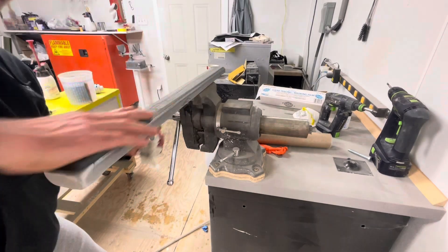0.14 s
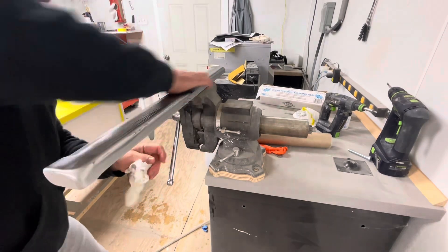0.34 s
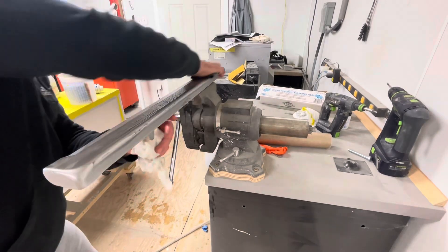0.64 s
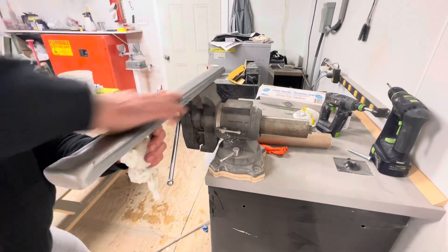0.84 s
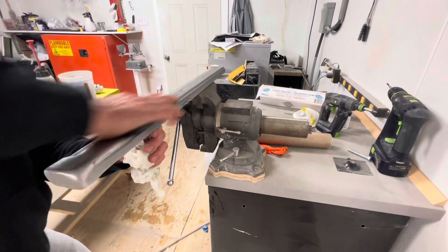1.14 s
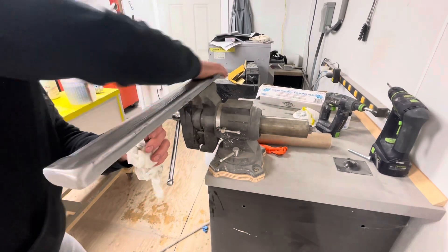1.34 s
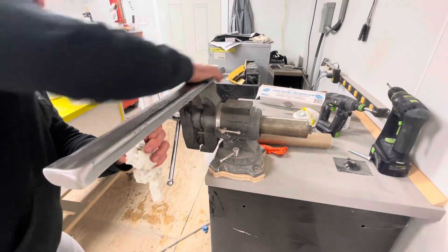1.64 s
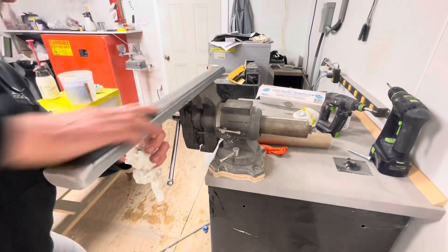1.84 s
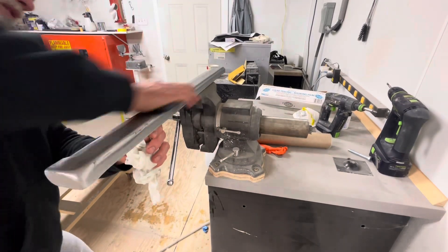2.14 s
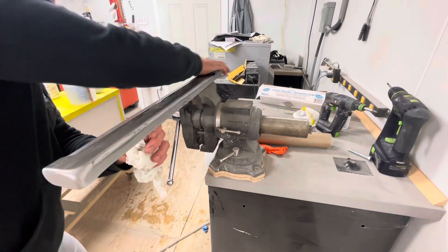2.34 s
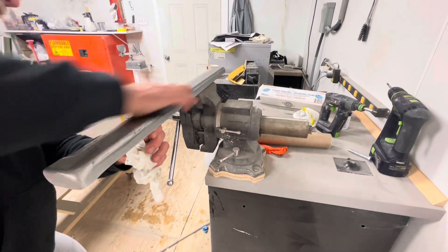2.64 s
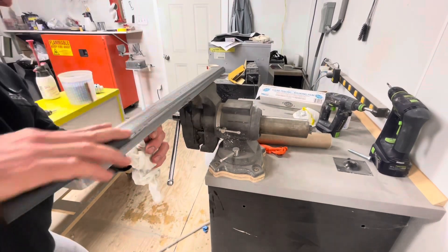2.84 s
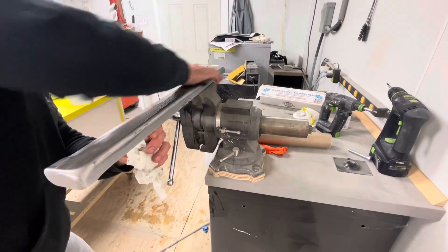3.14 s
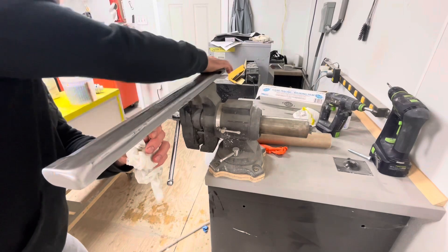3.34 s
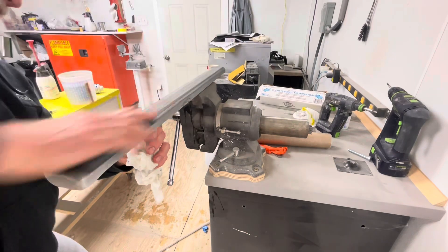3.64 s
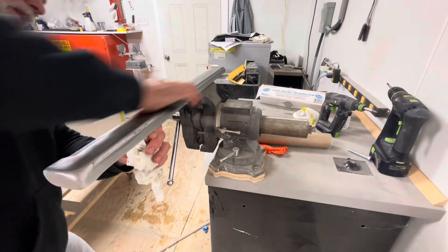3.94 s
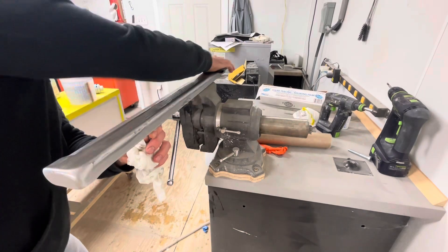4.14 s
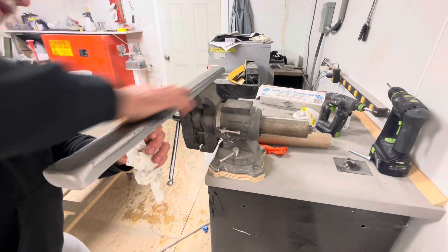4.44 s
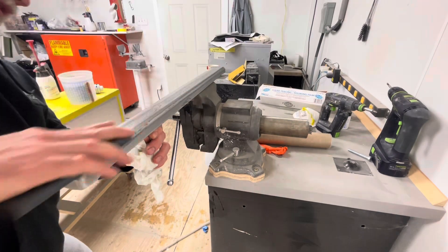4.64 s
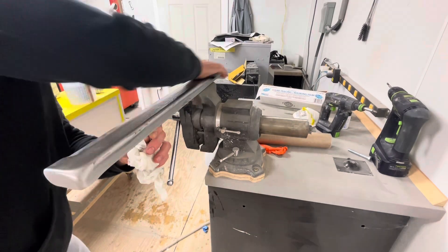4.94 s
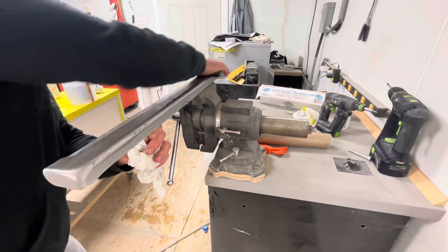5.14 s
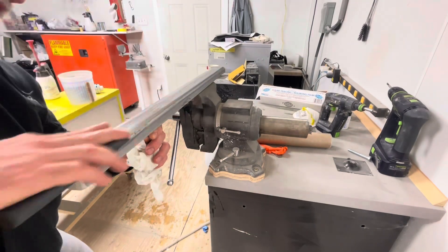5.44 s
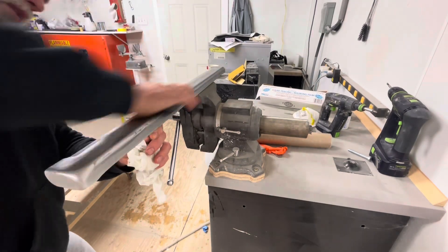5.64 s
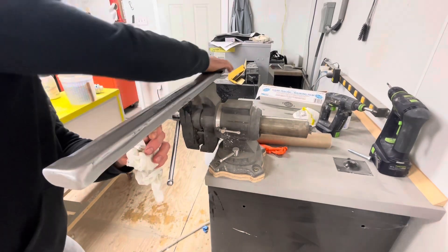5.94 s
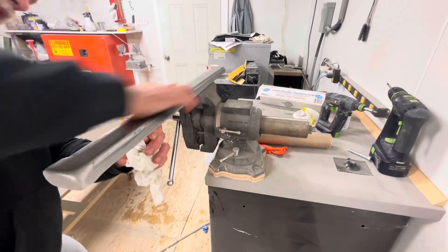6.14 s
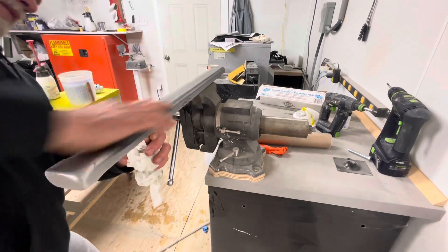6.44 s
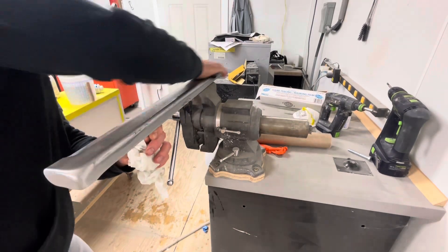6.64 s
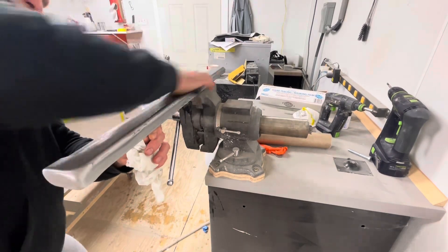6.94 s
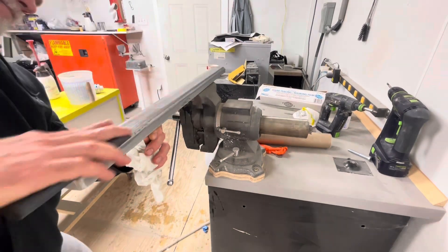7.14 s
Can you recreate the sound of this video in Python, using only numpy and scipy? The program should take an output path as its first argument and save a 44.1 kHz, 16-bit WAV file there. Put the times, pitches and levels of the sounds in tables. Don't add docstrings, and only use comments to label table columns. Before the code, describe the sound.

Sanding is already under way at 0 s: gritty paper scrapes along a clamped steel bar in strokes of roughly 0.45 s, alternately pulling near and pushing away. Each stroke is a dense, dry hiss with bright scratch, fizzy treble and a nasal metallic rasp, surging mid-stroke and dropping almost out at the turn. A soft sleeve rustle fades at the start. A low thud comes at about 0.6 s, then another cloth brush and a cluster of dull bench knocks at 1.0-1.2 s. From about 1.5 to 3.7 s the pressure is firmer and louder; a very faint rustle comes near 3.9 s. Strokes continue with small uneven surges, slightly lighter around 4.2 and 6.3-7 s, the last one pressing harder from 7.2 s until the cut. Low bench rocking follows the turns, while a quiet fan and motor hum persist in short workshop reverberation.

```python
import sys
import numpy as np
from scipy import signal
from scipy.fft import rfft, irfft, next_fast_len
from scipy.io import wavfile
from scipy.ndimage import uniform_filter1d, map_coordinates

SR = 44100
rng = np.random.default_rng(int(sys.argv[2]) if len(sys.argv) > 2 else 0)


def digitize_waveform(pressure):
    field = np.atleast_2d(pressure).T
    bounded = np.clip(field, -1, 1)
    quanta = np.round(bounded * 32767).astype(np.int16)
    wavfile.write(sys.argv[1], SR, quanta)


def amplitude_ratio(level_db):
    exponent = np.asarray(level_db, float) / 20
    return 10 ** exponent


N = 321489

# start [s], pressure [dB], pressure gained by the end [dB], coarse grains [dB], jolt to bench [dB].
STROKES = [(-.4, -33, 0.5, 2, -55), (0.073, -34, -2, 1, -58), (0.526, -33.5, 0.5, 0.5, -46),
           (.977, -33.5, -2, 0.5, -49), (1.472, -31.5, -1.5, -.5, -46), (1.931, -31, 0, 0, -44),
           (2.39, -30, 2.5, 1, -49), (2.813, -28.5, -2, .5, -41), (3.288, -29, 1, -1, -44),
           (3.725, -29.5, -3, -1, -48), (4.17, -32, 2, 0, -45), (4.601, -29.5, -0.5, -1, -42.5),
           (5.04, -30.5, 3, -1.5, -47), (5.463, -31, -1.5, -0.5, -41.5), (5.925, -30.5, 3, -1.5, -49),
           (6.333, -32.5, -2.5, -.5, -43), (6.78, -32, -1, -1.5, -40.5), (7.195, -27.5, 10, -2.5, -37)]
LAST_TURN_S = 7.6
WIN = 512


def unit(x):
    return x / np.sqrt(np.mean(np.abs(x) ** 2) + 1e-20)


def hump(x, centre, width):
    return np.exp(-((x - centre) / width) ** 2)


def along(rows, hz):
    f, *cols = np.transpose(rows)
    return [np.interp(np.log(hz + 1), np.log(f + 1), c) for c in cols]


def curves(rows):
    s, *cols = np.transpose(rows)
    return [np.interp(np.arange(N) / SR, s, c) for c in cols]


def wobble(rate_hz):
    knots = rng.standard_normal(int(N * rate_hz / SR) + 4)
    return map_coordinates(knots, [np.arange(N) * rate_hz / SR])


def coloured(x, gain):
    m = next_fast_len(N + 8192)
    return unit(irfft(rfft(x, m) * gain(np.fft.rfftfreq(m, 1 / SR)), m)[..., :N])


def peaks(modes, hz):
    return sum(db / (1 + (2 * (hz - c) / w) ** 2) for c, w, db in modes)


def smooth_grid(shape, bins, frames):
    field = uniform_filter1d(rng.standard_normal(shape), size=bins, axis=0)
    return unit(uniform_filter1d(field, size=frames, axis=1))


def turns():
    return np.array([row[0] for row in STROKES] + [LAST_TURN_S])


def place(t):
    return .5 + .5 * np.cos(np.pi * np.interp(t, turns(), np.arange(len(STROKES) + 1)))


def hand():
    # time [s], length [s], pressure [dB], bite of the rasp [dB].
    surges = [(.01, 0.046, 2, -1.5), (0.222, 0.055, -2.5, -3), (0.703, 0.076, 0, -1),
              (0.893, 0.046, 2, -1.5), (1.392, 0.059, 3, -1.5), (1.747, 0.051, -0.5, -2.5),
              (2.1, 0.057, 3, -5), (2.523, .05, -0.5, 2.5), (2.683, 0.057, 0, -3), (2.86, .03, -2, -0.5),
              (3.44, 0.056, 0, 3), (3.626, .04, 2.5, -2), (3.916, .04, -1.5, 3.5), (4.332, 0.034, 2, .5),
              (4.506, 0.039, 3.5, -3.5), (4.846, .05, -2, 0.5), (4.927, .03, 2, -3), (5.046, .03, 2.5, -1),
              (5.18, 0.036, 0.5, -2), (5.288, 0.046, .5, 2.5), (5.6, .05, 0, 0.5), (6.165, 0.036, 0, 3.5),
              (6.414, 0.031, 2.5, 0.5), (6.69, 0.054, 2, -5), (6.894, 0.037, 0, -2),
              (7.015, 0.026, 3, -1.5)]
    break_db, break_at_s, break_s = 4.5, 0.024, 0.015
    tremor_db, tremor_hz = 0.59, 8.3
    t = np.arange(0, N + 99, 100) / SR
    count = np.interp(t, turns(), np.arange(len(STROKES) + 1))
    start, press_db, gain_db, coarse_db, _ = np.array(STROKES)[count.astype(int)].T
    s, length_s, *surge_db = np.transpose(surges)
    bear_db, bite_db = surge_db @ hump(t, s[:, None], length_s[:, None])
    away = count % 2 >= 1
    press_db = press_db + gain_db * (count % 1 - .5) + bear_db
    coarse_db = coarse_db + break_db * away * hump(t - start, break_at_s, break_s)
    controls = uniform_filter1d(np.array([press_db, coarse_db, bite_db, 1. - away]), size=6)
    pressure_db, *rest = curves(np.transpose([t, *controls]))
    return pressure_db + tremor_db * wobble(tremor_hz), *rest


def loudness_db(law, where, pressure_db):
    level_db, power, far_db, vise_db = law
    creep_near, creep_far = 0.016, 0.058
    snap_far = 0.26
    creep = creep_near + where * (creep_far - creep_near)
    speed = np.sqrt(4 * np.abs(where * (1 - where)) + creep ** 2)
    speed_db = 20 * power * (1 - snap_far * where) * np.log10(speed)
    jaws_db = vise_db * hump(where, .64, 0.28)
    return level_db + pressure_db + speed_db + jaws_db - far_db * (where - .5)


def patchy(x, patchy_db, nodes_db):
    _, t, z = signal.stft(x, SR, nperseg=WIN)
    field = smooth_grid(z.shape[1:], 8, 8)
    shapes = uniform_filter1d(rng.standard_normal((z.shape[1], 100)), size=14, axis=1, mode="wrap")
    streaks = shapes[:, (99 * place(t)).astype(int)]
    gain_db = patchy_db * field + nodes_db * unit(streaks).clip(-2, 2)
    return signal.istft(z * amplitude_ratio(gain_db), nperseg=WIN)[1][:, :N]


def sanding():
    # frequency [Hz], density [dB per Hz].
    drone_curve = [(500, -29), (900, -18.5), (1250, -7), (1550, -2.5), (1900, 0), (2300, -5.5), (3000, -24)]
    rasp_curve = [(1700, -25.5), (2300, -7.5), (2800, 1.5), (3400, 1), (4000, -2.5), (4800, -56.5)]
    scratch_curve = [(2800, -27.5), (3600, -15.5), (4500, 0), (5300, 0), (6200, 0.5), (7300, -3),
                     (8300, -2), (9200, -33.5)]
    fizz_curve = [(6800, -58), (8000, -23), (8800, -6), (9600, 2), (10200, -1.5), (11000, -7.5),
                  (12000, -13.5), (13000, -22), (13500, -23.5), (15600, -25.5), (15750, -90)]
    # frequency [Hz], width [Hz], lift [dB].
    bar_modes = [(1398, 160, 4.5), (1540, 86, 4.5), (1717, 100, 3.5), (3200, 35, -7), (4240, 84, 6),
                 (5194, 100, 4.5), (5590, 76, 4.5), (9360, 71, -10.5)]
    # level dB, power of speed, loss to the far end dB, dB over the vise jaws
    scratch_law, fizz_law = (4, 0.7957, 1.5, -2), (6, 0.92, 2.5, -1.5)
    rasp_law, drone_law = (-2.5, 0.67, .3, -2.5), (-13, -0.06, 0.5, -2.2)
    # place 0-1, width, lift dB
    rasp_spot, drone_spot = (0.46, 0.18, 3.9), (0.026, 0.056, 2.63)
    grip_speed, pull_drone_db = 0.13, -0.3

    pressure_db, coarse_db, bite_db, back = hand()
    where = place(np.arange(N) / SR)
    clumps = amplitude_ratio(0.79 * wobble(25) + 0.31 * wobble(300))
    grain_db = 2.04 * rng.exponential(size=N).clip(0, 4)
    grit = rng.standard_normal((2, N)) * amplitude_ratio(grain_db) * clumps
    grit = patchy(grit, patchy_db=1.0, nodes_db=2.0)

    def layer(colour, law):
        rung = coloured(grit, lambda hz: amplitude_ratio(along(colour, hz)[0] + peaks(bar_modes, hz)))
        return amplitude_ratio(loudness_db(law, where, pressure_db)) * rung

    def freer(spot):
        centre, width, lift_db = spot
        return amplitude_ratio(lift_db * hump(where, centre, width))

    speed = 2 * np.sqrt(np.abs(where * (1 - where)))
    gripping = amplitude_ratio(pull_drone_db * back) * np.tanh(speed / grip_speed)
    drone = gripping * freer(drone_spot) * layer(drone_curve, drone_law)
    rasp = amplitude_ratio(bite_db) * freer(rasp_spot) * layer(rasp_curve, rasp_law)
    scratch = layer(scratch_curve, scratch_law)
    fizz = layer(fizz_curve, fizz_law)
    return scratch + amplitude_ratio(coarse_db) * (drone + rasp) + fizz


def fan():
    # frequency [Hz], density [dB per Hz].
    air_curve = [(22, -50), (45, -11.5), (75, -5.5), (105, -9.5), (170, -5.5), (250, -12), (310, -17.5),
                 (450, -11.5), (700, -18), (1100, -16), (1600, -20), (3000, -22), (9000, -22), (14000, -64)]
    # frequency [Hz], width [Hz], lift [dB].
    hum_modes = [(119.4, 15, 4.5), (166.7, 13.3, 7), (208, 26, 5), (434, 16, 5.5), (526, 8.8, 8),
                 (803, 13, 10.5)]
    # time [s], level [dB].
    fan_level = [(0, -42), (1, -41.5), (2, -42.5), (3, -42), (4, -43.5), (5, -44.5), (6, -43.5),
                 (7.29, -44)]
    motor_hz, motor_db = 377.5, -55.5
    air = coloured(rng.standard_normal((2, N)), lambda hz: amplitude_ratio(along(air_curve, hz)[0] + peaks(hum_modes, hz)))
    phase = 2 * np.pi * motor_hz * np.arange(N) / SR + 1.7 * wobble(8.6)
    tone = amplitude_ratio(motor_db + 3.5 + 0.37 * wobble(6)) * np.sin(phase)
    return amplitude_ratio(curves(fan_level)[0] + 0.62 * wobble(3.1)) * air + tone * [[1], [0]]


def cloth():
    # start [s], level [dB], rise [s], t60 [s].
    brushes = [
        (-.03, -36.5, .02, 0.65),
        (1.02, -36, 0.018, 0.6),
        (3.88, -50, .04, .3),
    ]
    # frequency [Hz], density [dB per Hz].
    cloth_curve = [(120, -30), (220, -10), (600, 4), (1200, 2), (2000, -33)]
    t = np.arange(N) / SR
    swell = np.zeros(N)
    for s, db, rise_s, t60_s in brushes:
        since = (t - s).clip(0)
        swell += amplitude_ratio(db - 60 * since / t60_s) * (1 - np.exp(-since / rise_s))
    return swell * coloured(rng.standard_normal((2, N)), lambda hz: amplitude_ratio(along(cloth_curve, hz)[0]))


def bench():
    # time [s], peak [dB], frequency [Hz], t60 [s].
    bumps = [
        (.612, -29, 60, .1),
        (.645, -35, 170, .1),
        (1.04, -30, 165, .12),
        (1.05, -33, 250, .12),
        (1.113, -32, 110, .06),
        (1.165, -30, 170, .15),
    ]
    jolt_rise_s = (0.037, 0.08)
    jolt_t60_s, rest_db, rock_hz = 0.43, -59, 76.2
    rock = coloured(rng.standard_normal(N), lambda hz: 1 / (1 + ((hz - 78) / 9) ** 2))
    out = np.pad(amplitude_ratio(rest_db) * rock, (SR, SR))
    t = np.arange(SR // 2) / SR
    for k, (s, *_, db) in enumerate(STROKES):
        rise_s = jolt_rise_s[k % 2]
        jolt = amplitude_ratio(-60 * (t - rise_s) / jolt_t60_s) * (1 - np.exp(-(t / rise_s) ** 3))
        hz = rock_hz + 4.4 * rng.standard_normal()
        out[SR + round(s * SR):][:len(t)] += amplitude_ratio(db + 3.5) * jolt * np.sin(2 * np.pi * hz * t)
    for s, db, hz, t60_s in bumps:
        thud = amplitude_ratio(db - 60 * t / t60_s) * (1 - np.exp(-t / 0.0039))
        out[SR + round(s * SR):][:len(t)] += thud * np.sin(2 * np.pi * hz * t)
    return out[SR:][:N]


def shop(x):
    # frequency [Hz], t60 [s].
    decay = [(200, 0.65), (2000, 1), (10000, 0.16)]
    hz, t, z = signal.stft(rng.standard_normal((2, SR // 2)), SR, nperseg=256)
    tail = signal.istft(z * amplitude_ratio(-60 * t / along(decay, hz)[0][:, None]), SR, nperseg=256)[1]
    late = np.pad(x, ((0, 0), (200, 0)))
    return signal.fftconvolve(late, tail / np.linalg.norm(tail[0]), axes=1)[:, :N]


def ports(pair, where):
    # frequency [Hz], left's lead near, halfway, far [radians].
    lead_rows = [(450, -.2, -.2, -.2), (700, 3.1, 3.1, -3.1), (1500, 3.2, 3.1, 0), (2100, 3.5, 3, 1),
                 (3000, 5.9, 4, 3.1), (4000, 7.2, 5.9, 5.3), (4500, 8.6, 6.4, 5.2), (5400, 9.6, 8, 3.3)]
    # frequency [Hz], lead [radians].
    beam_rows = [(5300, -np.pi), (6100, .2), (7500, 0), (7700, 0), (7950, np.pi), (8250, 2.8), (8700, 0),
                 (9800, -np.pi), (10300, -np.pi), (11800, -2 * np.pi), (12350, -2 * np.pi),
                 (13500, -3 * np.pi), (14900, -4 * np.pi)]
    # frequency [Hz], left-right likeness near, far [0-1].
    alike_rows = [(60, .99, .99), (150, .97, .97), (300, .66, .66), (500, .5, .5), (620, .15, .15),
                  (800, .5, .45), (1500, .75, .25), (2200, .48, .45), (3000, .52, .8), (4300, .55, .3),
                  (6300, .55, .5), (7300, .38, .58), (7850, .15, .15), (8700, .75, .68), (9300, .85, .85)]
    # frequency [Hz], likeness [0-1].
    treble_alike = [(9300, .85), (9800, 1), (10300, 1), (11000, .78), (11550, .72), (11800, 1), (12350, 1),
                    (12600, .75), (13300, .5), (14400, .5), (15200, 1)]
    # frequency [Hz], left minus right near, far [dB].
    lean_rows = [(305, -2, -1.5), (900, 6.5, -0.7), (2080, 0.5, -0.5), (2620, 2, -1.5), (3020, 3, 3.5),
                 (4380, 5.5, -1), (5300, 10, 3), (7240, 2, 7), (8900, 2, -7)]
    hz, t, (a, b) = signal.stft(pair, SR, nperseg=WIN)
    p = where(t)
    f = hz[:, None]
    near, half, far = along(lead_rows, f)
    lead = np.where(p < .5, near + 2 * p * (half - near), far + 2 * (1 - p) * (half - far))
    beam = np.clip((f - 5000) / 900, 0, 1)
    arrow = (1 - beam) * np.exp(1j * lead) + beam * np.exp(1j * along(beam_rows, f)[0])
    near, far = along(alike_rows, f)
    alike = np.where(f > treble_alike[0][0], along(treble_alike, f)[0], near + p * (far - near))
    alike = alike ** np.exp(.8 * smooth_grid(a.shape, 5, 10))
    turn = np.arccos(np.clip(alike * abs(arrow), 0, 1)) / 2
    near, far = along(lean_rows, f)
    lean = amplitude_ratio((near + p * (far - near)) * (f < lean_rows[-1][0]) / 2)
    left = (np.cos(turn) * a + np.sin(turn) * b) * lean * np.exp(1j * np.angle(arrow))
    right = (np.cos(turn) * a - np.sin(turn) * b) / lean
    return signal.istft(np.array([left, right]), SR, nperseg=WIN)[1][:, :N]


def scene():
    rub = sanding()
    around = fan() + cloth() + amplitude_ratio(-12.5) * shop(rub) + bench() * [[1], [0]]
    return ports(rub, place) + ports(around, lambda t: 0.47 + 0 * t)


def starved(x, masked_db, scatter_db, budget_db):
    # frequency [Hz], threshold [dB re the mean loudness of the moment].
    heard = [(9000, -45), (10500, -19), (12400, -14), (13000, -10), (13600, -8.2), (14500, -6.5),
             (15600, -5), (15750, 40)]
    window = np.sin(np.pi * (np.arange(2048) + .5) / 2048)
    frames = dict(fs=SR, window=window, nperseg=2048)
    hz, _, z = signal.stft(np.array([x[0] + x[1], x[0] - x[1]]) / 2, **frames)
    f = hz[:, None]
    power = np.abs(z) ** 2
    loud = power[:, (hz > 2000) & (hz < 11000)].mean(axis=(0, 1))
    beside = np.abs(uniform_filter1d(power.max(axis=0), size=24, axis=0)) * (f > 1500)
    band = np.arange(len(hz)) // 16
    treble = f > 9500
    luck_db = scatter_db * rng.standard_normal((2, band[-1] + 1, z.shape[2]))[:, band]
    budget = unit(uniform_filter1d(rng.standard_normal((2, 1, z.shape[2])), size=3))
    luck_db += budget_db * budget * treble
    floor = loud * amplitude_ratio(2 * along(heard, f)[0])
    edge = np.maximum(floor, beside * amplitude_ratio(2 * (masked_db + 3 * treble)))
    keep = uniform_filter1d(power, size=7, axis=1) > edge * amplitude_ratio(2 * luck_db)
    mid, side = signal.istft(z * keep, **frames)[1][:, :N]
    return np.array([mid + side, mid - side])


def band_limit(x):
    return signal.sosfilt(signal.butter(12, 16750, fs=SR, output="sos"), x)


def record(dry):
    thinned = starved(dry, masked_db=-12, scatter_db=4, budget_db=3)
    return band_limit(thinned)


dry = scene()
out = record(dry)
digitize_waveform(out)
```